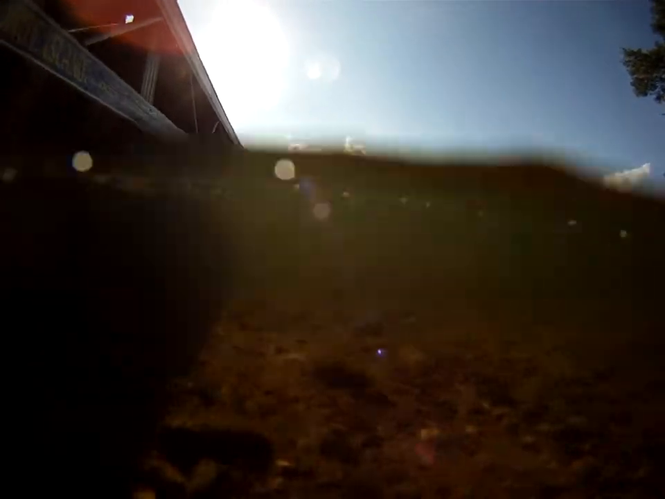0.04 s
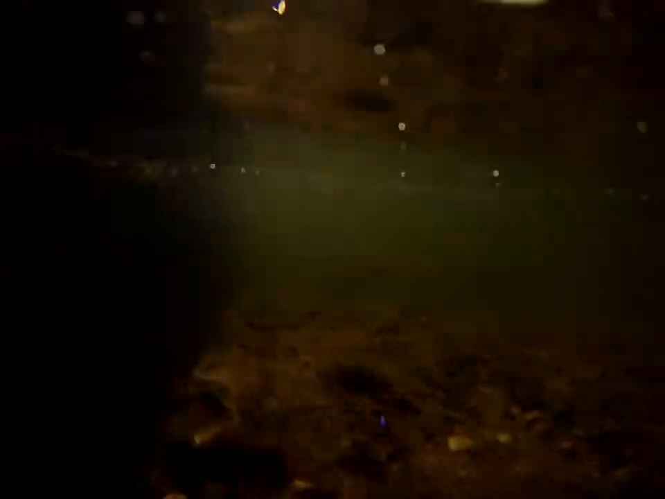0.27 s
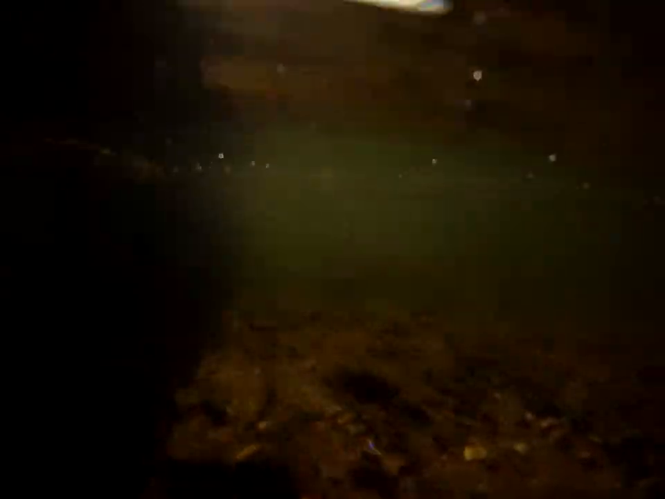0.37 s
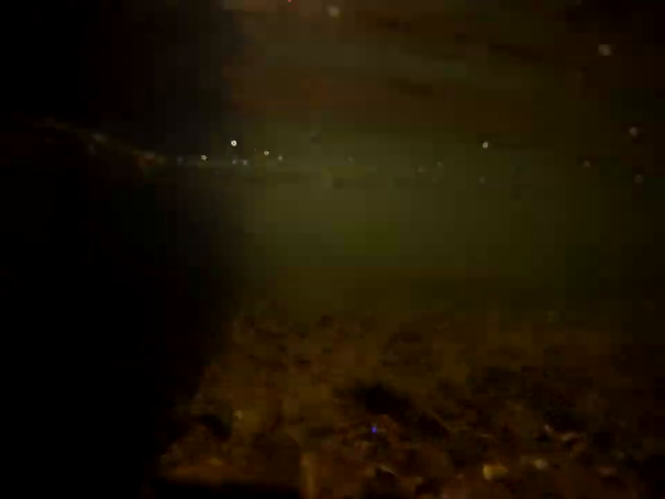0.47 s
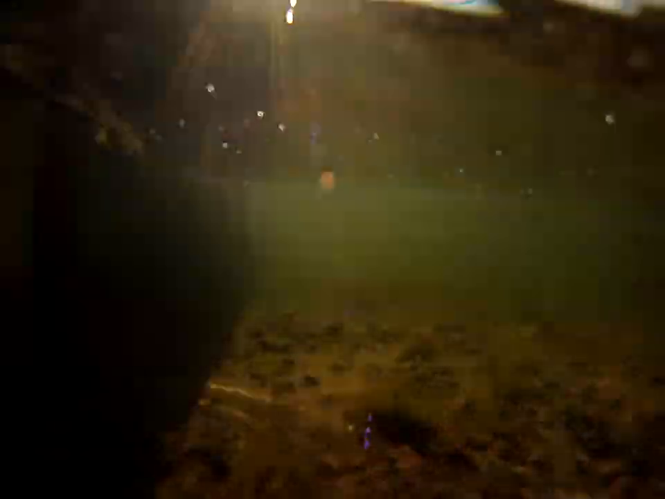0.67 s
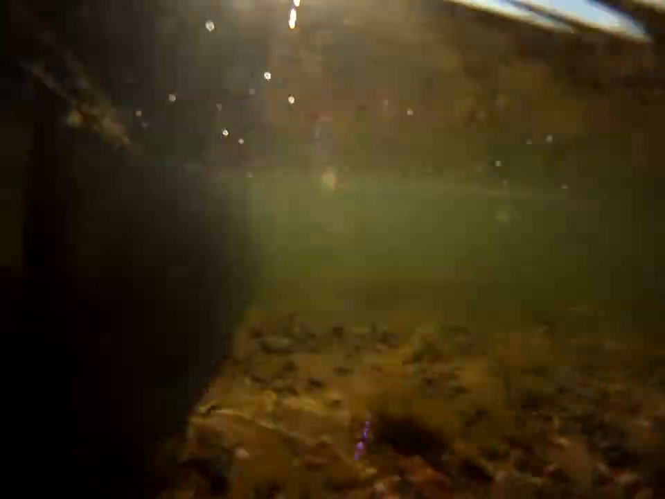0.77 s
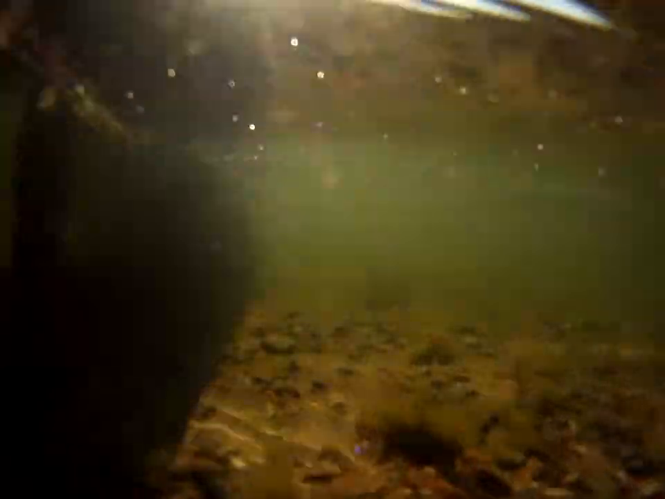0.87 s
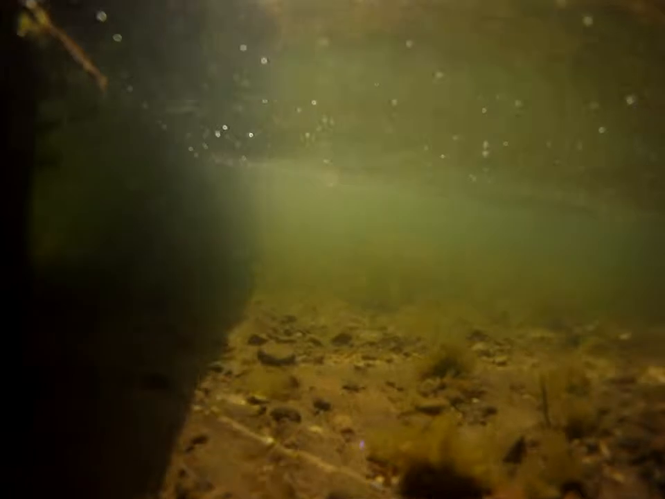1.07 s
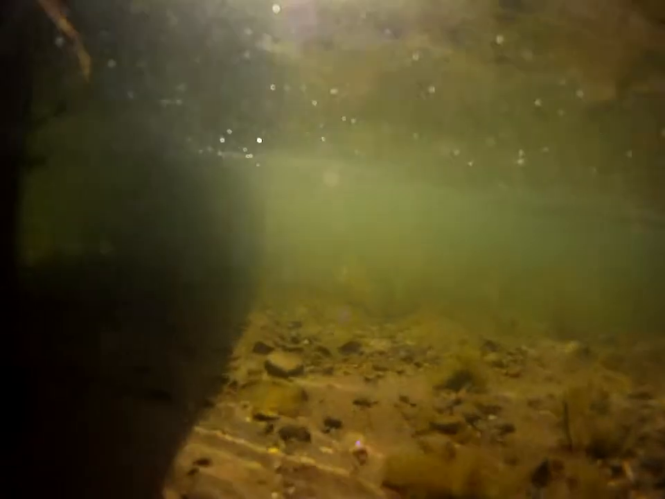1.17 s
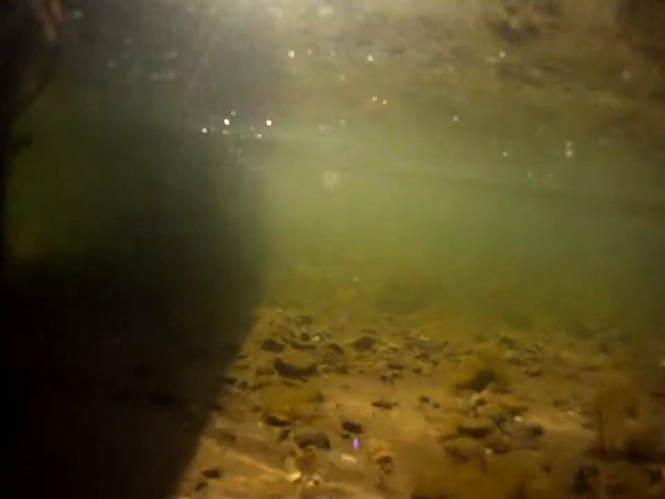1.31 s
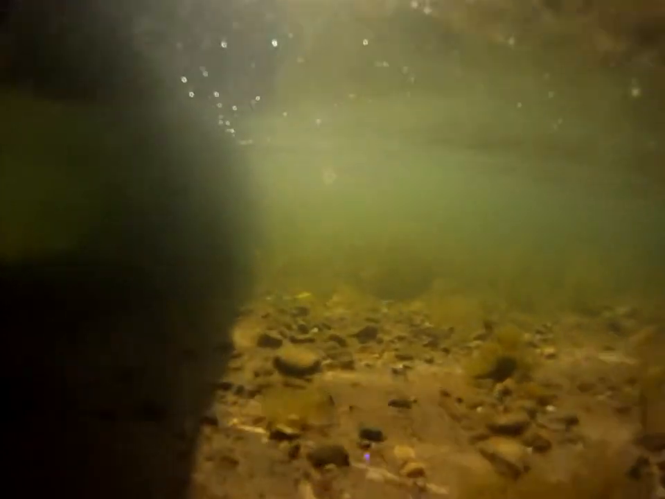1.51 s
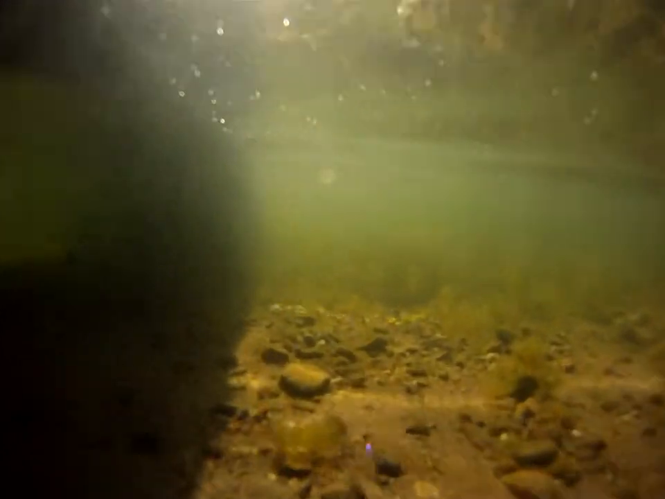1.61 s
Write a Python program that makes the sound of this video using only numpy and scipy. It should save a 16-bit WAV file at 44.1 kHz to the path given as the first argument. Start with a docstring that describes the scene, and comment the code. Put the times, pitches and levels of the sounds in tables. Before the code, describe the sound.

Water laps and bubbles closely around a submerging microphone. Small bubbles ring over a dull wash, then from 0.2 seconds irregular laps arrive, each a quick squelch with a low throb. A faint fizz builds to one sharp, close plop at about 0.9 seconds. A busy run of laps and bubbles churns from 1.1 to 1.4 seconds, then dies down to a deep rumble.

```python
"""Water laps round a camera dipping under the surface beside a dock. First, small bubbles ring over a
dull wash. From 0.2 s the laps arrive, each trapping air against the housing: a quick falling squelch,
then a low throb. Fizz builds until, at 0.86 s, a bubble bursts close by in a sharp plop. A last busy run
of laps churns from 1.1 to 1.4 s and dies down to a rumble. Throughout, the camera holds each sample of
a slow clock, which mirrors every sound faintly into the high treble."""
import sys
import numpy as np
from scipy.fft import rfft, irfft, next_fast_len
from scipy.io import wavfile
from scipy.ndimage import map_coordinates

SR = 44100
rng = np.random.default_rng(int(sys.argv[2]) if len(sys.argv) > 2 else 0)


def wav_out(sig):
    """Save sig, one row per channel (or a flat mono array), as 16-bit PCM at SR to the path in sys.argv[1]."""
    wavfile.write(sys.argv[1], SR, np.round(np.clip(np.atleast_2d(sig).T, -1, 1) * 32767).astype(np.int16))


N = 72765
TIME = np.arange(N) / SR


def amp(db):
    """Decibels to gain."""
    return 10 ** (np.asarray(db) / 20)


def filtered(x, response):
    """EQ a signal with a gain curve, given as a function of frequency in Hz."""
    size = next_fast_len(N + SR // 2)
    return irfft(rfft(x, size) * response(np.fft.rfftfreq(size, 1 / SR)), size)[:N]


def noise(eq):
    """Noise of rms 1, coloured by (frequency [Hz], level [dB]) points."""
    eq_hz, eq_db = np.transpose(eq)
    white = rng.standard_normal(N)
    coloured = filtered(white, lambda hz: amp(np.interp(np.log(hz + 1), np.log(eq_hz + 1), eq_db)))
    return coloured / coloured.std()


def wobble(rate_hz):
    """Smooth random modulation, gliding through rate_hz values a second."""
    knots = rng.standard_normal(int(N * rate_hz / SR) + 4)
    return map_coordinates(knots, [TIME * rate_hz])


def fader(points):
    """A fader ride in dB through (time [s], level [dB]) points."""
    return np.interp(TIME, *np.transpose(points))


def since(start):
    """Seconds since a cue, zero before it."""
    return np.maximum(TIME - start, 0)


def envelope(t, attack_s, t60):
    """A quick attack and a tail that falls 60 dB in t60 seconds."""
    return (1 - np.exp(-t / attack_s)) * np.exp(-np.log(1000) * t / t60)


# Laps hitting the housing, and at 0.868 s the burst's own low throb: (time [s], throb level [dB], throb pitch
# [Hz], squelch and splash level [dB], squelch start pitch [Hz])
LAPS = [(.229, -24.5, 93.8, -35, 1510), (.2955, -20, 89.3, -27.5, 2137), (0.336, -23, 90.3, -27.5, 2193),
        (.3562, -11, 88.4, -26.5, 1123), (0.3705, -46, 98, -26.5, 2030), (.5935, -15.5, 85.4, -33, 880),
        (.6248, -17, 82.4, -31, 1010), (.652, -15.5, 73.5, -30, 1070), (.674, -18, 75.5, -27.5, 1890),
        (.703, -18, 72.3, -33.5, 960), (.7425, -19, 83.7, -30.5, 1650), (0.868, -20, 70.9, -32.5, 896),
        (.881, -15, 71.4, -33.5, 770), (.897, -29, 82.5, -34, 810), (.993, -17, 79.5, -30, 926),
        (1.1295, -15, 78.4, -29, 954), (1.158, -18.5, 69.3, -28.5, 1120), (1.165, -10.5, 79, -29.5, 1737),
        (1.1935, -18.5, 81.6, -34, 1200), (1.272, -15.5, 78.6, -34.5, 1445),
        (1.302, -14.5, 77.4, -28, 1450), (1.3191, -10, 76.8, -29.5, 1550), (1.330, -26.5, 73, -29, 970),
        (1.3589, -16.5, 85.3, -28, 1483), (1.383, -25.5, 70, -28.5, 900), (1.43, -29, 67.2, -33.5, 726),
        (1.579, -38.5, 76.6, -47.5, 702), (1.605, -37, 71.6, -59.5, 712)]
# Resonances of the housing: (pitch [Hz], level against the throb [dB], t60 [s])
HOUSING_MODES = [(119, -22.5, 0.046), (220.1, -13.5, 0.1), (372.8, -18, 0.084), (500, -29.5, 0.1),
                 (590.6, -18.5, 0.0539), (725, -31.5, 0.031), (802, -38.5, 0.065)]
# Tone of a splash, for laps and bubbles alike: (frequency [Hz], relative level [dB])
SPLASH_EQ = [(100, -20), (300, -17), (480, 2), (750, 7.5), (1050, -10), (1600, -4), (2300, -11),
             (2800, -25.5), (3700, -18), (4500, -66), (6000, -38.5)]


def laps():
    """Each lap squelches down in pitch, splashes, rings the housing and leaves an air pocket throbbing."""
    squelch_end_hz, fall_s = 147, 0.00364
    throb_lag_s, low_cut_hz = 0.0012, 42
    throb, housing, squelch, splash_power = np.zeros((4, N))
    for start, throb_db, throb_hz, squelch_db, start_hz in LAPS:
        t, late = since(start), since(start + throb_lag_s)
        air_pocket = np.sin(2 * np.pi * throb_hz * late)
        throb += amp(throb_db) * envelope(late, attack_s=0.0024, t60=0.18) * air_pocket
        for mode_hz, mode_db, t60 in HOUSING_MODES:
            ring = envelope(t, attack_s=0.0023, t60=t60) * np.sin(2 * np.pi * mode_hz * t)
            housing += amp(throb_db + mode_db + rng.normal(0, 1)) * ring
        dive_hz = squelch_end_hz + (start_hz - squelch_end_hz) * np.exp(-t / fall_s)
        rough_hz = dive_hz * np.exp(0.22 * wobble(700))
        phase = 2 * np.pi * np.cumsum(rough_hz * (t > 0)) / SR
        squelch += amp(squelch_db + 5) * envelope(t, attack_s=0.0043, t60=0.029) * np.sin(phase)
        splash_power += (amp(squelch_db - 7) * envelope(t, attack_s=0.00096, t60=0.055)) ** 2
    throb = filtered(throb, lambda hz: hz ** 2 / np.hypot(hz ** 2, low_cut_hz ** 2))
    splash = np.sqrt(splash_power) * noise(SPLASH_EQ)
    return squelch + splash + housing + throb


# The burst, as a lead-in, a main hit and its rebounds: (time [s], level [dB], pitch [Hz], t60 [s])
PLOP_HITS = [(0.8547, -20, 2250, 0.01), (.8628, 9, 2240, 0.0086), (0.8696, -7, 2080, 0.008),
             (0.8756, 4, 2130, 0.0046), (0.8802, -9, 2200, 0.0069)]
# Tone of the spray: (frequency [Hz], relative level [dB])
SPRAY_EQ = [(200, -15.5), (700, -10), (1300, -1), (2100, 5), (2600, -19.5), (3100, -14), (3700, -8.5),
            (4500, -34), (6000, -30)]


def plop():
    """A bubble bursts against the housing: a few loud cycles and spray, then weaker rebounds."""
    attack_s = 0.0012
    spray = amp(-23.5) * noise(SPRAY_EQ)
    out = np.zeros(N)
    for start, db, hz, t60 in PLOP_HITS:
        t = since(start)
        rounded_attack = 1 - np.exp(-(t / attack_s) ** 2)
        ring = rounded_attack * np.exp(-np.log(1000) * t / t60) * np.sin(2 * np.pi * hz * t)
        out += amp(db) * (ring + spray * envelope(t, attack_s, t60=0.024))
    return out


# Small ringing bubbles: (time [s], level [dB], start pitch [Hz], t60 [s])
BUBBLE_PINGS = [(.0105, -44, 2000, 0.013), (.0345, -47, 2050, 0.0084), (0.053, -32, 1140, 0.036),
                (0.1161, -32, 1020, 0.034), (.152, -41, 2180, 0.0092), (.481, -42.5, 960, 0.029),
                (.504, -48, 1570, 0.04), (0.5579, -33, 1167, 0.05), (.5925, -41.5, 1894, 0.037),
                (.747, -37, 690, 0.023), (.9795, -36.5, 520, .03), (1.1222, -36, 1180, 0.05),
                (1.2409, -24, 1513, 0.03), (1.2937, -35.5, 1993, 0.038), (1.3075, -35, 700, 0.021),
                (1.333, -37, 2100, .025), (1.3335, -21.5, 356.3, 0.073), (1.34, -19.5, 1742, 0.027),
                (1.385, -28.5, 652, 0.035), (1.435, -37, 697, 0.053), (1.4503, -33, 2040, 0.026),
                (1.523, -55, 1980, 0.037), (1.581, -49.5, 643, 0.052)]


def bubbles():
    """Small bubbles ring in a little splash, their pitch creeping up as they near the surface."""
    glide_per_s = 1.3  # pitch rise, as a multiple of the start pitch
    splash = amp(-11.5) * noise(SPLASH_EQ)
    out = np.zeros(N)
    for start, db, hz, t60 in BUBBLE_PINGS:
        t = since(start)
        ping = np.sin(2 * np.pi * hz * (t + glide_per_s * t * t / 2))
        out += amp(db) * envelope(t, attack_s=0.0004, t60=t60) * (ping + splash)
    return out


# Droplet hits, and at 0.8696 s the burst's own snap: (time [s], level [dB])
DROPLET_HITS = [(0.2225, -35), (0.24, -43), (0.271, -50.5), (.741, -41), (0.8696, -21.5), (0.9421, -32.5),
                (1.343, -40)]
# Bright tone of a droplet: (frequency [Hz], relative level [dB])
DROPLET_EQ = [(300, -2.5), (1000, 2), (2300, 7.5), (3600, 2.5), (4500, -3.5), (5400, -1), (6000, -20.5)]


def droplets():
    """Droplets snap on the housing, and the burst adds a snap of its own, each a tight tick of noise."""
    snaps = sum(amp(db) * envelope(since(start), attack_s=0.0004, t60=0.0098)
                for start, db in DROPLET_HITS)
    return snaps * noise(DROPLET_EQ)


# Surges of the slosh: (time [s], level [dB])
SLOSH_FADER = [(0, -61.5), (.5, -64.5), (.65, -48), (.85, -53), (1.05, -66), (1.199, -38.5), (1.28, -53),
               (1.34, -36), (1.42, -57), (1.501, -58.5), (1.65, -53.5)]
# Dark tone of the slosh: (frequency [Hz], relative level [dB])
SLOSH_EQ = [(80, 8), (180, 5.5), (290, 2.5), (380, -4.5), (600, -2.5), (780, -7.5), (1000, -21),
            (1500, -18.5), (2200, -24.5), (3000, -43.5)]


def slosh():
    """Water churns along the housing, most during the last run of laps."""
    churn_db = 4.5 * wobble(69.96)
    return amp(fader(SLOSH_FADER) + churn_db) * noise(SLOSH_EQ)


# Build and fall of the fizz: (time [s], level [dB])
FIZZ_FADER = [(0, -60), (.18, -64.5), (.3, -65), (.6, -70), (.67, -60), (.745, -53), (0.822, -58),
              (.858, -44.5), (0.899, -62.5), (1.05, -72), (1.65, -69)]
# Thin tone of the fizz: (frequency [Hz], relative level [dB])
FIZZ_EQ = [(500, -15.5), (1500, -9.5), (2000, -0.5), (2450, 1.5), (2650, -1), (2950, -12), (3750, -10),
           (5000, -24), (6000, -13.5)]


def fizz():
    """Tiny bubbles seethe in a grainy hiss that builds into the plop."""
    grain_db = 3 * wobble(260)
    return amp(fader(FIZZ_FADER) + grain_db) * noise(FIZZ_EQ)


# Dull tone of the water bed: (frequency [Hz], relative level [dB])
WASH_EQ = [(20, -18.5), (35, -7.5), (55, -21), (80, 13.5), (125, -12), (250, -24), (600, -28), (1200, -22),
           (2200, -35.5), (3000, -32), (4000, -33.5), (5200, -36), (6000, -43)]
# Swells of the rumble: (time [s], level [dB])
RUMBLE_FADER = [(0, -55), (0.178, -55.5), (0.249, -33.5), (.45, -42.5), (.55, -52), (.7, -42), (.9, -50.5),
                (1.082, -47.5), (1.2, -33.5), (1.35, -42), (1.5, -32.5), (1.559, -49.5), (1.65, -31.5)]
# Sub-bass tone of the rumble: (frequency [Hz], relative level [dB])
RUMBLE_EQ = [(12, -10.5), (28, -2), (45, -5), (75, -7), (110, -34), (300, -68)]


def wash():
    """Moving water lays a dull, steady bed over a deep, swelling rumble."""
    bed = amp(-50 + wobble(19)) * noise(WASH_EQ)
    rumble = amp(fader(RUMBLE_FADER)) * noise(RUMBLE_EQ)
    return bed + rumble


def scene():
    """The mono mix: everything reaches one microphone through the housing."""
    return (laps() + plop() + bubbles() + droplets() + slosh() + fizz() + wash())[None]


def record(dry):
    """The camera's sample-and-hold mirrors the band under half its clock into a faint, glassy top end."""
    clock_hz, high_cut_hz = 12000, 15600
    band = filtered(dry[0], lambda hz: 1 / np.sqrt(1 + (hz / (0.46 * clock_hz)) ** 40))
    # Differentiate, ring-modulate, integrate: the lower a sound, the fainter its mirror image.
    slope = filtered(band, lambda hz: 1j * hz)
    sidebands = slope * 2 * np.cos(2 * np.pi * clock_hz * TIME)
    mirror = amp(1.5) * filtered(sidebands, lambda hz: -1j / np.maximum(hz, clock_hz / 2))
    return filtered(band + mirror, lambda hz: 1 / np.sqrt(1 + (hz / high_cut_hz) ** 160))[None]


dry = scene()
out = record(dry)
wav_out(out)
```